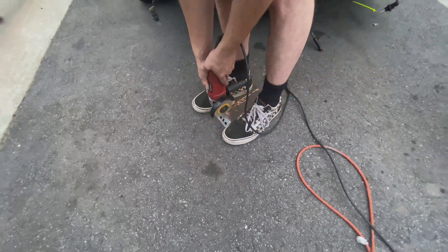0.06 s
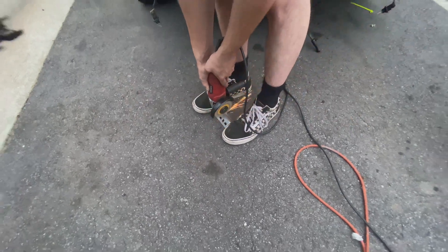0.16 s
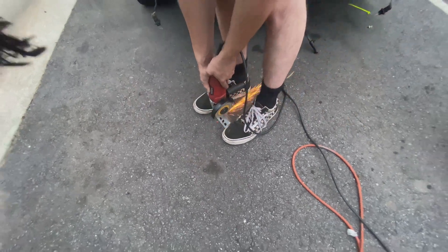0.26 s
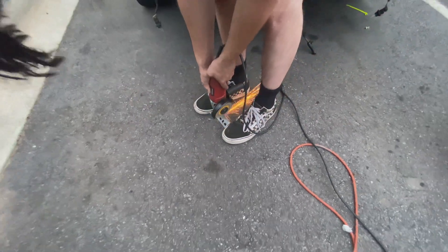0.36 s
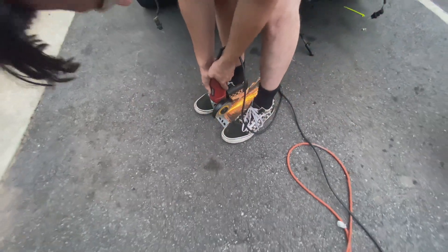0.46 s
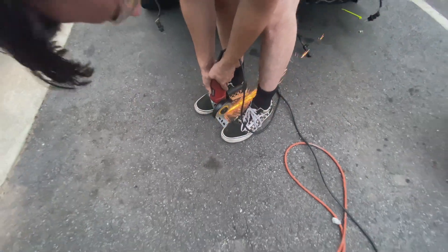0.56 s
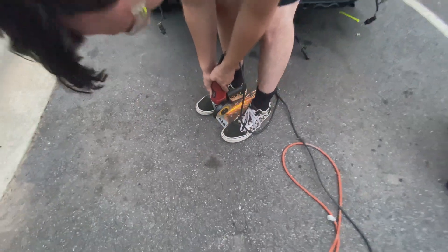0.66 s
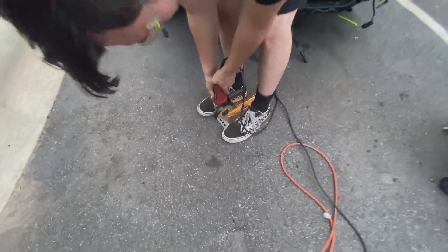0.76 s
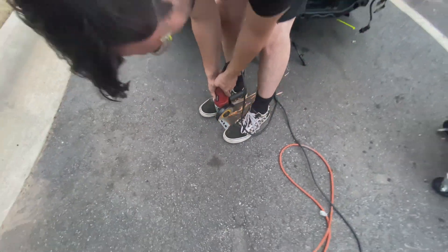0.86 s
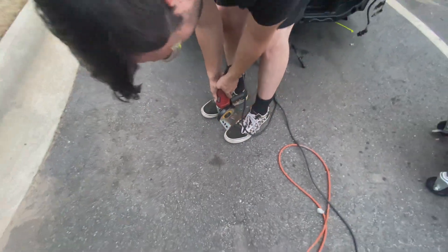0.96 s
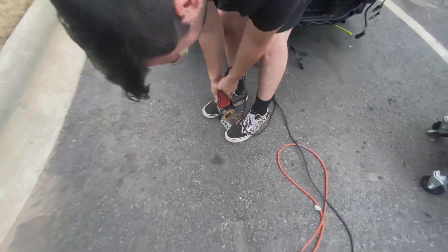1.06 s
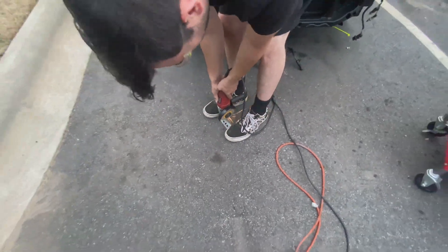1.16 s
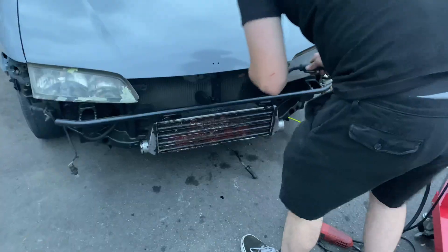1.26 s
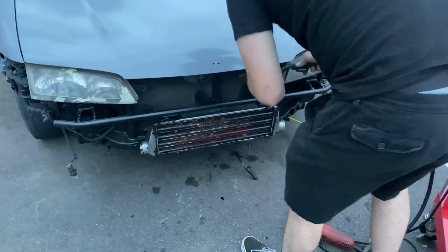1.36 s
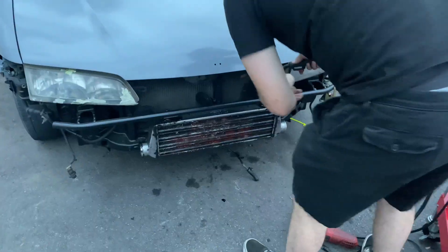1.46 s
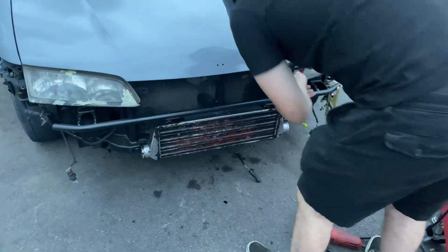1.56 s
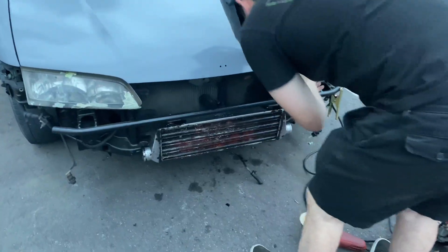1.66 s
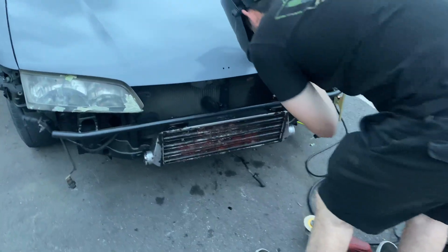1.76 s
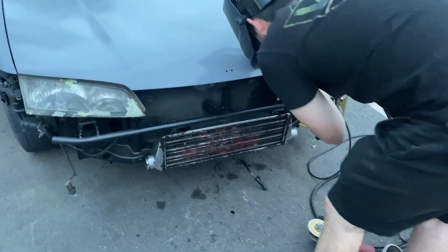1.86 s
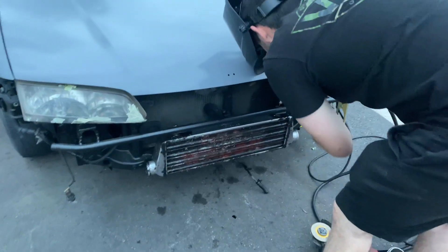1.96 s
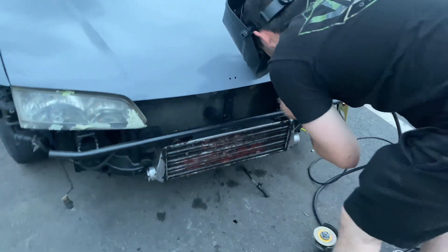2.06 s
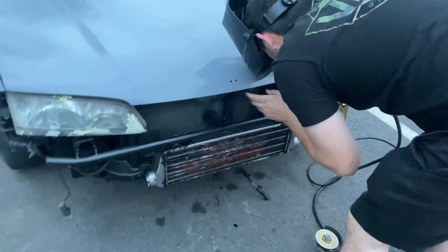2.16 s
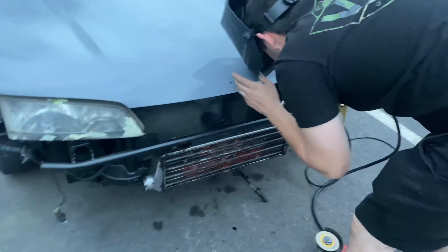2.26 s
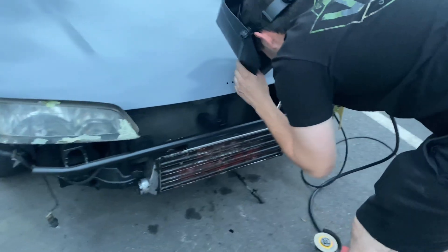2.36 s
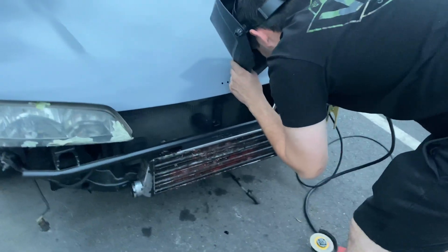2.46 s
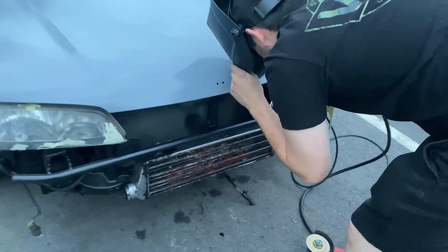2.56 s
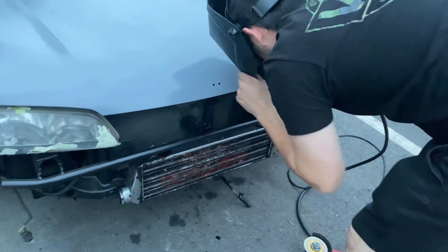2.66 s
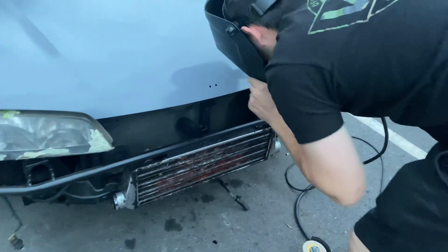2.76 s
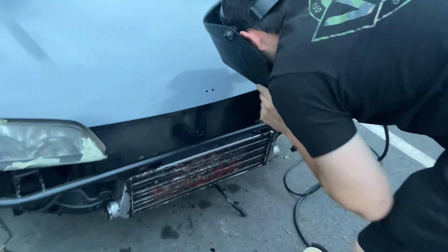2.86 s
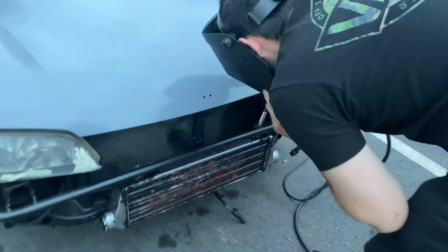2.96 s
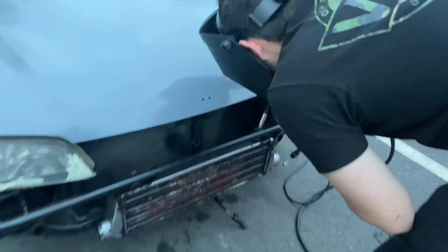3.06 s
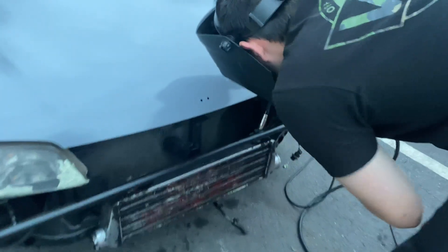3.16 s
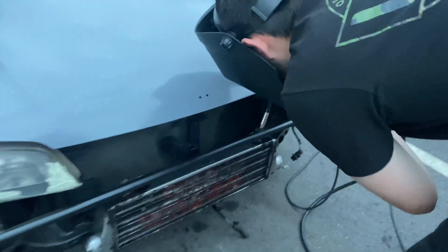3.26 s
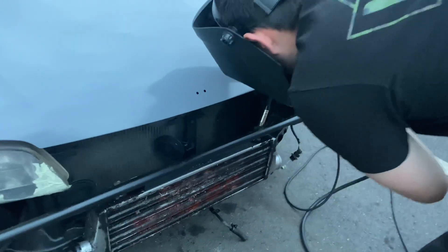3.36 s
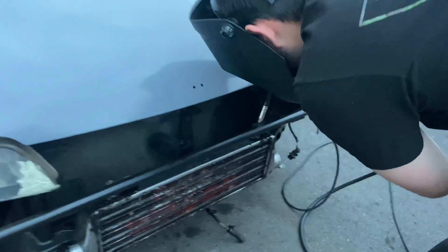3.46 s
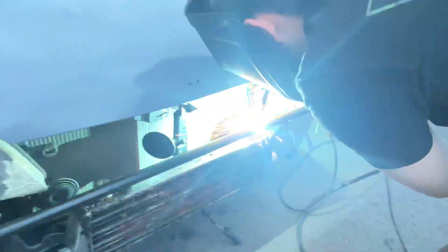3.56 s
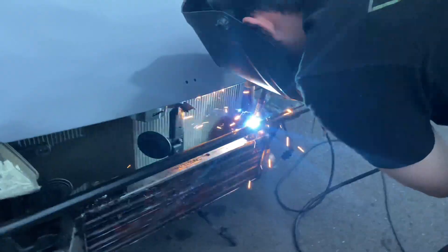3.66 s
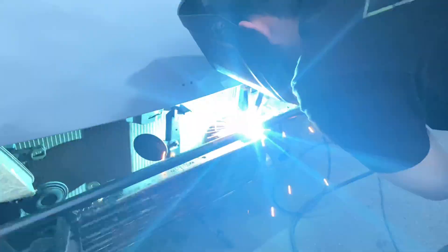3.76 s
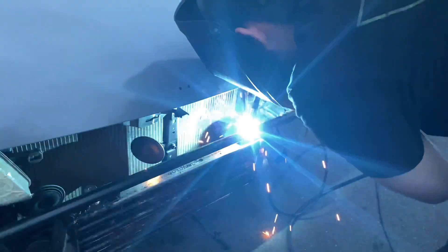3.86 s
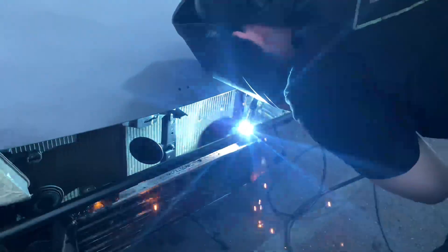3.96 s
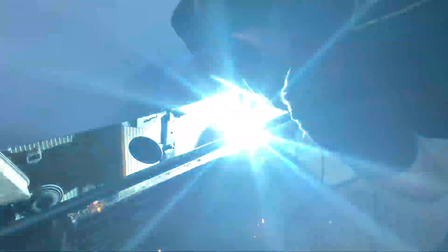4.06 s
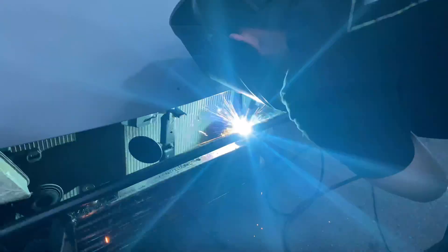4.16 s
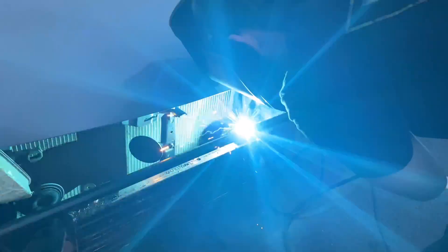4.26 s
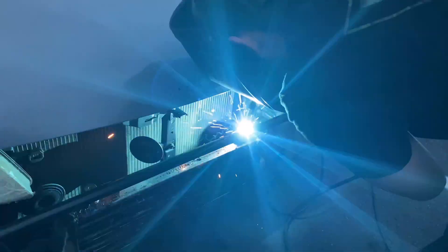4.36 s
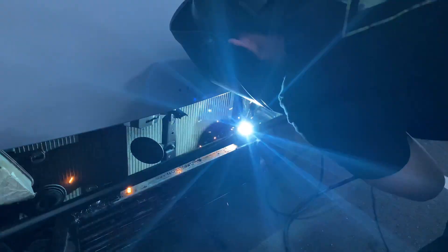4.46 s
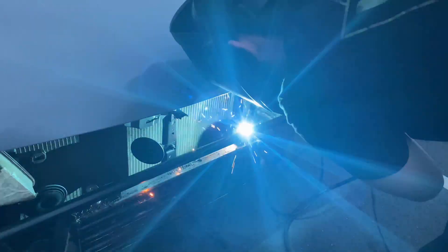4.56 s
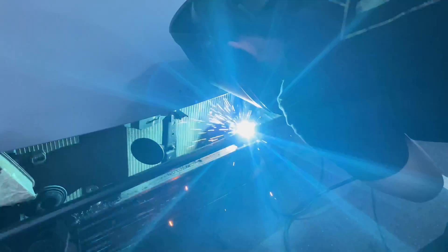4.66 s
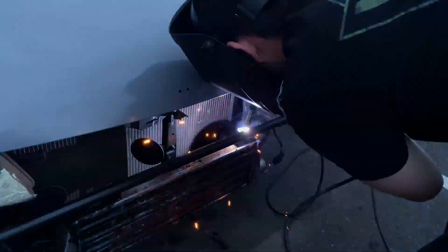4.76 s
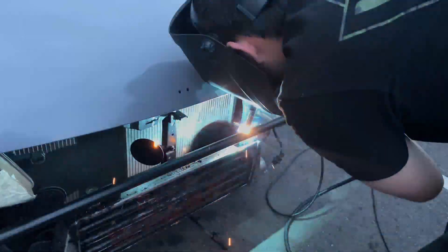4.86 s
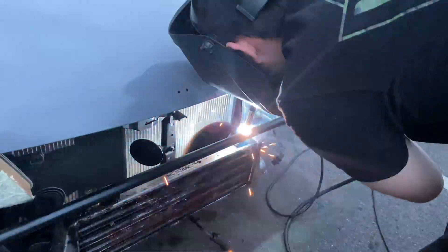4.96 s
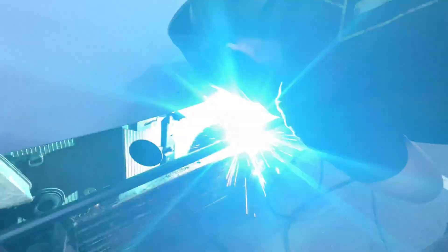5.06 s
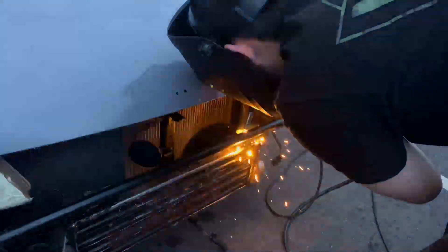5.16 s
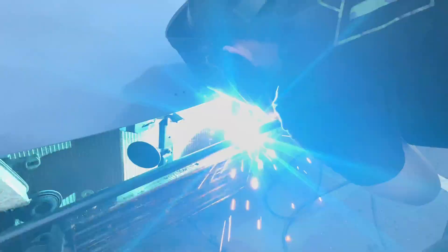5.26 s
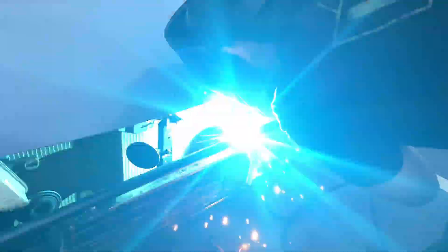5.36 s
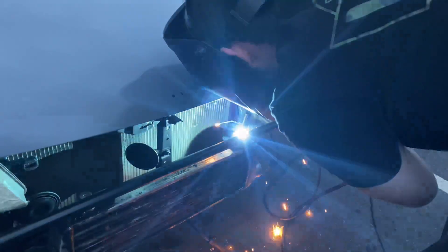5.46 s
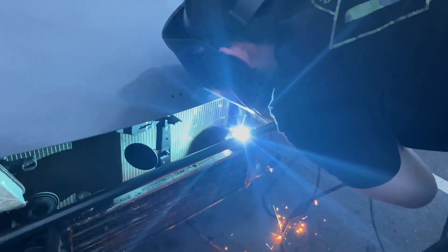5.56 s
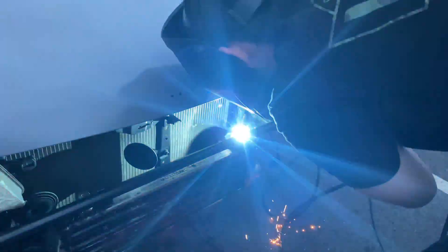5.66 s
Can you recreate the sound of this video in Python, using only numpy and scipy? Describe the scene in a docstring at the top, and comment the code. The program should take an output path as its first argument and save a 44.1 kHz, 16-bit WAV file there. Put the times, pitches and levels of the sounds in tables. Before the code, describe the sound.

A power cutting tool rasps harshly through steel, stops dead, then quiet handling and clunks give way to sputtering welding crackles outdoors.

```python
"""An angle grinder cuts steel: a toothed noise that repeats with the wheel, over motor hum, until it stops dead.
The scene jumps to welding at a car's front: fan whine and air, then knocks, rustles, scrapes and hollow clunks.
Shielding gas starts to hiss as decaying filtered noise; the wire strikes the steel with a clink.
The arc then stutters: grain bursts with bass thumps for pops, noise swells around them and for flares.
Low rumble runs throughout; a stereo phone close by adds echoes, delayed lows and a treble limit."""
import sys
import numpy as np
from scipy import signal
from scipy.fft import rfft, irfft, next_fast_len
from scipy.io import wavfile
from scipy.ndimage import uniform_filter1d

SR = 44100
rng = np.random.default_rng(int(sys.argv[2]) if len(sys.argv) > 2 else 0)


def waveform_to_disk(signal):
    """Save audio, clipped to [-1, 1], as 16-bit WAV at the path in sys.argv[1]."""
    frames = np.transpose(np.atleast_2d(signal))
    scaled = np.clip(frames, -1, 1) * 32767
    samples = np.round(scaled).astype(np.int16)
    wavfile.write(sys.argv[1], SR, samples)


N = 251811
T = np.arange(N) / SR
SIZE = next_fast_len(N + SR // 2)
HZ = np.arange(SIZE // 2 + 1) * SR / SIZE
CUT_S = 1.201  # end of the grinding, start of the welding scene

# arc pops: (time [s], level [dB], thump level [dB], spitting length [ms])
POP_EVENTS = [(3.4965, -25, -34, 0.46), (3.5018, -19.5, -57, 11), (3.523, -23, -44.5, 29),
              (3.5412, -29, -59, 3.7), (3.547, -17, -35.5, 10), (3.7101, -21, -39, 9.9),
              (3.721, -21, -44, 8.8), (3.7285, -22, -50, 9.8), (3.741, -28, -60, 13),
              (3.7621, -26, -52, 3.2), (3.784, -21.5, -56, 5.3), (4.094, -18.5, -40, 10.4),
              (4.1239, -18, -27, 7.5), (4.1626, -29.5, -57, 3.5), (4.1916, -28.5, -65, 3.2),
              (4.219, -33.5, -63, 3.3), (4.2428, -27, -53, 4.6), (4.264, -25.5, -54, 4.8),
              (4.287, -29.5, -57, 3.5), (4.3086, -26.5, -58, 6.9), (4.354, -25, -64, 3.5),
              (4.3697, -25.5, -69, 1.1), (4.387, -30.5, -64, 5.1), (4.4631, -19.5, -47, 11),
              (4.4872, -19, -35, 6.7), (4.6067, -18, -59, 4.4), (4.7923, -38, -92, 5.7),
              (4.976, -37, -76, 8.2), (4.996, -18, -41, 5.8), (5.18, -23, -47.5, 6.8),
              (5.223, -26, -55.5, 7), (5.2414, -28.5, -51, 8.5), (5.3236, -23.5, -69, 8.4),
              (5.345, -25, -75, 3.4), (5.5749, -25, -73, 8.5), (5.5854, -28, -77, 3.3)]
POP_BODY_DB = -5.5  # body against treble


def undb(db):
    """Decibels to gain."""
    return 10 ** (np.asarray(db) / 20)


def curves(rows):
    """Each column of a table, joined by straight lines in time."""
    s, *columns = np.transpose(rows)
    return [np.interp(T, s, c) for c in columns]


def through(x, response):
    """Filter a sound by a frequency response."""
    return irfft(rfft(x, SIZE) * response, SIZE)[..., :N]


def colour(points, weight=1):
    """Response of unit power through (Hz, dB) points, straight in log frequency."""
    hz, db = np.transpose(points)
    gain = weight * undb(np.interp(np.log(HZ + 1), np.log(hz), db))
    return gain / np.sqrt(np.mean(gain ** 2))


def causal(gain):
    """Minimum-phase response with these gains: it never sounds ahead of its cause."""
    cepstrum = irfft(np.log(gain), SIZE)
    fold = (1 + np.sign(np.arange(SIZE))) * (np.arange(SIZE) < SIZE // 2)
    return np.exp(rfft(cepstrum * fold, SIZE))


def noise():
    """White noise of unit power."""
    return rng.standard_normal(N)


def walk(rate_hz):
    """Slow random curve through normal knots, rate_hz of them a second."""
    knots = rng.standard_normal(4096)
    return np.interp(T * rate_hz, np.arange(len(knots)), knots)


def unit(x):
    """Scale to unit energy."""
    return x / np.sqrt(np.sum(x ** 2, axis=-1, keepdims=True) + 1e-18)


def unit_power(x):
    """Scale a full-length track to unit power."""
    return np.sqrt(N) * unit(x)


def add(track, s, x):
    """Lay a short sound into a track at time s."""
    i = int(s * SR)
    track[i:i + len(x)] += x[:N - i]


def burst(ms, first, grain_db, fade=4):
    """A sharp click, then uneven smaller ones that die after ms, more abruptly the higher fade is."""
    t = T[:SR // 10]
    clicks = rng.standard_normal(len(t)) * undb(grain_db * rng.standard_normal(len(t)))
    cluster = unit(clicks * np.exp(-(t / (max(ms, .1) / 1000)) ** fade))
    cluster[0] += first
    return unit(cluster)


def swell(s, db, rise_s, fall):
    """Gain that grows exponentially to a crest at s and dies away fall times as slowly."""
    return undb(db) * np.exp(-np.maximum(s - T, (T - s) / max(fall, .1)) / max(rise_s, .002))


def shares(body_db):
    """Gains of body and treble that keep the total power."""
    total = np.hypot(1, undb(body_db))
    return undb(body_db) / total, 1 / total


def voiced(body, treble, points, split_hz=5100):
    """Colour two excitations with the lower and the upper part of one spectrum."""
    low = 1 / (1 + (HZ / split_hz) ** 6)
    return through(body, colour(points, low)) + through(treble, colour(points, 1 - low))


def bass(x, points, skew_rad=0.96):
    """Coloured low sound, out of step between the two microphones by skew_rad."""
    return through(x, colour(points) * np.exp(.5j * skew_rad * np.array([[1], [-1]])))


def spread(points, side_db):
    """Coloured stereo noise, wider the higher side_db is."""
    mid, side = noise(), undb(side_db) * noise()
    return through(np.array([mid + side, mid - side]), colour(points))


def reflections(near_db, near_s, tail_db, t60):
    """Dense echoes off nearby metal and ground, then a short outdoor tail."""
    t = T[:SR // 4]
    near, tail = rng.standard_normal((2, len(t)))
    near = undb(near_db) * unit(near * np.exp(-(t / near_s) ** 4))
    return near + undb(tail_db) * unit(tail * undb(-60 * t / t60))


def place(x, near_db, near_s, tail_db, t60, scatter_db, turn_hz=450, beam_hz=10000):
    """Direct sound, then echoes that differ between the microphones, less so above beam_hz."""
    shared, left, right = (reflections(near_db, near_s, tail_db, t60) for _ in range(3))
    lag_s = 9.9 / SR
    # the left microphone hears it later, and its treble in opposite phase
    port = np.exp(-2j * np.pi * HZ * lag_s) * (turn_hz - 1j * HZ) / (turn_hz + 1j * HZ)
    own, common = shares(scatter_db - 20 * np.clip(np.log2((HZ + 1) / beam_hz) / 0.27, 0, 1))
    direct = np.array([port, np.ones(len(HZ))])
    response = (1 + common * rfft(shared, SIZE)) * direct + own * rfft(np.array([left, right]), SIZE)
    # echoes ripple the spectrum finely but leave its broad colour alone
    return through(x, response / causal(np.sqrt(uniform_filter1d(abs(response) ** 2, size=900))))


def alternating(x, hold_s, count=3, **room):
    """Fades to another of count random echo patterns every hold_s, in a cycle."""
    weights = [np.clip(1 - abs((T / hold_s - k) % count - 1), 0, 1) for k in range(count)]
    return sum(place(x * weight ** .7, **room) for weight in weights)


def rim(turns, count=104, size=4096):
    """The wheel's own uneven edge, count random-phase harmonics, passes the steel anew on every turn."""
    profile = irfft(np.r_[0, np.exp(2j * np.pi * rng.random(count))], size)
    return np.interp(turns % 1 * size, np.arange(size), profile / profile.std())


def grinder(trim_db=-0.5, grit_db=8.0):
    """Edge and loose grit scratch the steel, a high spot bites once a turn, the motor hums and whines."""
    # load: (time [s], cut level before trim [dB], motor hum level [dB])
    load = [(0.0, -34, -76), (0.172, -35.5, -76), (0.45, -28.5, -71), (0.58, -29, -69),
            (0.864, -35.5, -56.5), (1.116, -36.5, -63), (1.152, -35, -69), (1.19, -37.5, -79)]
    # motor speed, sagging under load: (time [s], rotation [Hz])
    motor_speed = [(0, 468), (.17, 482.4), (.3, 481.9), (.52, 471.3), (.7, 477.7), (.9, 495.4),
                   (1.066, 503), (1.2, 504.5)]
    # motor whine: (multiple of motor speed, level at loudest hum [dB])
    motor_orders = [(2, -58), (3, -55), (31, -37)]
    # orders that sing in the cut: (multiple of wheel speed, level against the cut [dB])
    wheel_orders = [(8, -26), (48, -18), (49, -16), (57, -12), (69, -17), (73, -16), (78, -13)]
    # spectra of cut and bite: (frequency [Hz], relative level [dB])
    cut_colour = [(100, -25), (350, -34.5), (650, -25.5), (830, -3.5), (960, -6.5), (1100, -12),
                  (1400, -9.5), (1900, -10.5), (2500, -5), (3500, -2.5), (4200, -1.5), (4800, 1.5),
                  (5250, 6.5), (5700, 3.5), (6150, 6.5), (6900, -0.5), (7400, 6.5), (7900, -2), (8700, 21),
                  (9500, 7), (10500, 8.5), (11300, 3), (12000, 10), (13300, 2), (14700, 10.5), (15600, 0),
                  (16100, -48)]
    bite_colour = [(1500, -28), (5000, -17.5), (8000, -27), (8700, -1), (9800, 8), (12000, 14),
                   (13300, -5.5), (15500, -7.5), (16100, -53)]
    bite_db, bite_turns = -7, .03  # high spot: level against the cut, width as a share of a turn
    body_db, body_db_per_s = -10, 5.5  # body against treble; it fills out as the groove deepens

    db, motor_db = curves(load)
    motor = np.cumsum(curves(motor_speed)[0] * (1 + .0012 * walk(200))) / SR  # turns
    wheel = motor * 12 / 37  # turns, geared down
    strength = undb(2 * rng.standard_normal(2048)[wheel.astype(int)] + 2 * walk(9))
    bite = unit_power(strength * np.exp(-((wheel % 1 - .5) / bite_turns) ** 2))
    grit = unit_power(noise() * undb(grit_db * noise()))
    # the contact shifts from one part of the edge to another
    shift = walk(7)
    edge = np.cos(shift) * rim(wheel) + np.sin(shift) * rim(wheel)

    force = undb(db + trim_db)
    rasp = force * (.8 * grit + .58 * edge)
    scratch = force * (.55 * grit + .83 * edge)
    deepening = undb(body_db + body_db_per_s * np.minimum(T, CUT_S))
    cutting = voiced(rasp * deepening, scratch, cut_colour)
    biting = place(through(scratch * bite * undb(bite_db), colour(bite_colour)),
                   near_db=-9, near_s=.002, tail_db=-14, t60=.05, scatter_db=10)

    whine = sum(undb(order_db + 2 * walk(20)) * np.sin(2 * np.pi * k * motor) for k, order_db in motor_orders)
    # the freely spinning motor whines louder as its hum grows
    whine = whine * undb(.15 * (motor_db - motor_db.max()))
    hum = np.sqrt(2) * np.sin(2 * np.pi * motor) * undb(motor_db + 1.5 * walk(60))
    ring = force * sum(undb(order_db + 3 * walk(20)) * np.sin(2 * np.pi * k * wheel)
                       for k, order_db in wheel_orders)
    singing = place(whine + ring, near_db=-6, near_s=.003, tail_db=-14, t60=.05, scatter_db=6)
    heard = alternating(cutting, hold_s=.14, count=4,
                        near_db=0, near_s=.006, tail_db=-9, t60=.08, scatter_db=10)
    return heard + biting + singing + hum


def ringing():
    """Short decaying modes of the steel bumper tube and engine bay after one snap."""
    # modes: (frequency [Hz], relative level [dB], t60 [s])
    modes = [(1595, -2, .04), (1810, -5, .04), (2740, -2, .08), (2945, -2, .07), (3430, -4, .06),
             (5590, -6, .05), (6580, -3, .08), (6830, -4, .08)]
    t = T[:SR // 4]
    return sum(undb(db) * unit(np.sin(2 * np.pi * hz * t) * undb(-60 * t / t60)) for hz, db, t60 in modes)


def pops(snap=0.94):
    """The wire shorts and bursts: a snap, spitting droplets and a thump of hot gas."""
    # spectra of crackle and thump: (frequency [Hz], relative level [dB])
    pop_colour = [(100, -59.5), (300, -22), (450, -6), (600, -25), (740, -11), (950, -3), (1150, -2.5),
                  (1400, -7.5), (1680, 4.5), (2100, -12), (3200, -0.5), (4600, 6.5), (5700, 3.5),
                  (9000, 7.5), (10200, 4.5), (11700, 11), (15500, 7.5), (16500, -19)]
    thump_colour = [(25, -44.5), (70, 10), (150, 7.5), (380, 8.5), (650, -5), (2000, -10), (8000, -79)]
    body, treble, thumps = np.zeros((3, N))
    low, high = shares(POP_BODY_DB)
    for s, db, thump_db, ms in POP_EVENTS:
        # the shorter the burst, the more of it lies in the first snap
        spit = burst(ms, snap / max(ms, .5) ** 0.25, grain_db=8.5) * undb(db) * np.sqrt(0.017 * SR)
        add(body, s, low * spit)
        add(treble, s, high * spit)
        add(thumps, s, undb([thump_db]) * np.sqrt(0.01 * SR))
    crackle = voiced(body, treble, pop_colour) + undb(-24) * through(body, rfft(ringing(), SIZE))
    heard = alternating(crackle, hold_s=.045, count=5,
                        near_db=-1, near_s=.005, tail_db=-6, t60=.06, scatter_db=12)
    return heard + bass(thumps, thump_colour)


def hiss():
    """Shielding gas rushes from the nozzle as noise; the arc flares and sputters, and noise swells around pops."""
    # arc flares: (crest time [s], level [dB], body against treble [dB], rise [s])
    flares = [(3.714, -26, -11, 0.018), (3.956, -39, 2.5, 0.037), (4.097, -30, 7, 0.017),
              (4.28, -38.5, -2.5, 0.04), (4.455, -35.5, -19, 0.051), (4.588, -36.5, -14, 0.014),
              (4.749, -33, -6.5, 0.0093), (4.798, -32, 2, 0.0072), (4.826, -38, -4.5, 0.014),
              (4.883, -30, 2, 0.007), (4.941, -25, 6, 0.0035), (4.985, -26, 5, 0.014),
              (5.077, -33, 11, 0.0021), (5.14, -29, -10, 0.0044), (5.312, -36, -15.5, 0.056),
              (5.396, -36, -33, .008), (5.57, -24.5, -16, 0.027), (5.58, -38, 8, 0.0046),
              (5.641, -25, -23.5, 0.035)]
    # spectrum: (frequency [Hz], relative level [dB])
    hiss_colour = [(200, -49.5), (450, -31.5), (700, -24), (1200, -16.5), (1700, -5.5), (2400, -13.5),
                   (3600, -1), (4600, -3.5), (6000, 1.5), (9500, -1), (12000, 6), (15500, 3),
                   (16300, -38.5)]
    gas_on_s = 3.243  # the trigger opens the gas valve
    gas_db, gas_body_db, gas_fade_db_per_s = -46.5, -4, 10.5  # the first surge dies away
    flare_fall = 1.52  # as a multiple of the rise
    # faint spits while the arc barely holds; the level is for a spit of size 1
    sputter_start_s, sputter_end_s, sputter_per_s = 4.72, 5.3, 36
    sputter_db, sputter_rise_s, sputter_body_db = -45, .006, -0.5
    # soft noise swell around every pop: level against the pop, rise, fall as a multiple of the rise
    pop_swell_db, pop_swell_rise_s, pop_swell_fall = -13, .004, 3
    fizz_db = 4.5  # spread of the grains

    flow = undb(gas_db - gas_fade_db_per_s * np.maximum(T - gas_on_s, 0)) * (T > gas_on_s)
    fizz = unit_power(noise() * undb(fizz_db * noise() + 2 * walk(300)))
    chance = rng.random((40, 2))
    spit_times = sputter_start_s + np.cumsum(.5 + chance[:, 0]) / sputter_per_s

    parts = [(flow, gas_body_db)]
    for s, db, body_db, rise_s in flares:
        parts.append((swell(s, db, rise_s, flare_fall), body_db))
    for s, size in zip(spit_times, chance[:, 1]):
        if s < sputter_end_s:
            parts.append(((.5 + size) * swell(s, sputter_db, sputter_rise_s, flare_fall), sputter_body_db))
    for s, db, _, _ in POP_EVENTS:
        parts.append((swell(s, db + pop_swell_db, pop_swell_rise_s, pop_swell_fall), POP_BODY_DB))
    # powers of all parts add up
    low, high = np.sqrt(sum(np.outer(shares(body_db), gain) ** 2 for gain, body_db in parts))
    return place(voiced(low * fizz, high * fizz, hiss_colour),
                 near_db=1, near_s=.006, tail_db=1, t60=.07, scatter_db=12)


def strike():
    """The cold wire first stubs on the steel: a clink with a short chatter."""
    # one touch: time [s], level [dB], chatter length [ms]
    s, db, ms = (3.4959, -18, 5)
    # spectrum: (frequency [Hz], relative level [dB])
    strike_colour = [(1500, -16), (2400, -13.5), (2900, -3), (3500, -3), (4500, -7.5), (5700, -21),
                     (6800, -4), (8500, -46)]
    touch = np.zeros(N)
    add(touch, s, burst(ms, 2, grain_db=6) * undb(db) * np.sqrt(.017 * SR))
    return place(through(touch, colour(strike_colour)),
                 near_db=-4, near_s=.004, tail_db=-3, t60=.06, scatter_db=6)


def handling(fibre_db=4):
    """Torch and hands knock, a dull thud and clack with a short rattle; sleeves brush past as grainy noise."""
    # knocks: (time [s], thud level [dB], clack level [dB], rattle length [ms], thud left minus right [dB])
    knocks = [(1.348, -43, -56, 13, -11.5), (1.431, -46, -58.5, 35, -14), (1.571, -24.5, -28.5, 20, -5.5),
              (1.601, -35.5, -56, 20, -9), (1.722, -40.5, -36, 9.4, -6.5), (1.734, -34, -42, 17, -5),
              (2.0852, -43, -50, 8.4, -2), (2.381, -45.5, -66, 3, -0.5), (3.243, -75, -36, 15, 5)]
    # clothes: (start time [s], level [dB], length [s])
    rustles = [(1.357, -53, 0.11), (2.286, -66, 0.18), (2.478, -44.5, 0.14), (2.932, -60.5, 0.21)]
    # spectra of thud, clack and rustle, sliding cloth: (frequency [Hz], relative level [dB])
    thud_colour = [(25, -28), (45, -12), (80, 12), (130, 2.5), (220, 5.5), (350, 0.5), (550, 0), (800, -10),
                   (1500, -10.5), (8000, -79)]
    clack_colour = [(200, -8.5), (1000, 1.5), (2200, 2.5), (4000, -3), (7000, -18), (15000, -24)]
    swish_colour = [(3000, 0), (7000, 5), (9300, -21), (11500, 1.5), (15500, -25), (16300, -30)]
    swish_db = -59.5  # thin hiss of sliding cloth

    left, right, clacks, cloth, sliding = np.zeros((5, N))
    for s, thud_db, clack_db, ms, pan_db in knocks:
        blow = burst(ms, 3 / max(ms, .3), grain_db=3.0, fade=2.1) * np.sqrt(0.0059 * SR)
        add(left, s, blow * undb(thud_db + pan_db / 2))
        add(right, s, blow * undb(thud_db - pan_db / 2))
        add(clacks, s, blow * undb(clack_db))
    for s, db, length_s in rustles:
        stroke = np.sin(np.pi * np.clip((T - s) / length_s, 0, 1))
        cloth += undb(db) * stroke
        sliding += stroke
    fibres = unit_power(noise() * undb(fibre_db * noise() + 3.5 * walk(180)))
    bright = through(clacks + cloth * fibres, colour(clack_colour))
    bright += undb(swish_db) * through(sliding * fibres, colour(swish_colour))
    thuds = bass(np.array([left, right]), thud_colour)
    return thuds + place(bright, near_db=2.0, near_s=0.0034, tail_db=0.0, t60=0.069, scatter_db=28)


def clunks():
    """Single blows on a hollow shell, duller the softer the contact, with a short rattle of echoes."""
    # touch, landing and bounce: (time [s], level [dB], contact [ms])
    contacts = [(2.666, -31, 0.64), (2.6909, -21, .1), (2.728, -36, 0.85)]
    # spectrum: (frequency [Hz], relative level [dB])
    clunk_colour = [(25, -26), (75, 11.5), (200, 0), (420, -0.5), (620, 0), (900, 1), (1270, -11.5),
                    (2200, -8.5), (3400, -22.5), (15000, -36)]
    blows = np.zeros(N)
    for s, db, ms in contacts:
        push = np.hanning(2 + max(1, int(ms / 1000 * SR)))
        add(blows, s, push / push.sum() * undb(db) * np.sqrt(.01 * SR))
    echoes = rfft(np.array([reflections(-15, .004, -15, .08) for _ in range(2)]), SIZE)
    left_louder = undb(np.array([[1], [-1]]))
    return through(bass(blows, clunk_colour, skew_rad=2.0) * left_louder, 1 + echoes)


def scrapes(width=0.2):
    """A hand or sleeve catches and slips in short grainy strokes of band noise, each with its own pitch."""
    # strokes: (start time [s], level [dB], length [s], centre [Hz])
    strokes = [(1.385, -43, 0.014, 3750), (1.747, -49, .012, 3860), (2.504, -45, 0.021, 2420),
               (2.508, -36.5, 0.022, 725), (2.54, -44, 0.015, 1030), (2.56, -46.5, 0.089, 1350),
               (2.616, -43, 0.013, 480), (3.013, -51, 0.044, 2700), (3.038, -48, 0.024, 2020)]
    out = 0
    for s, db, length_s, hz in strokes:
        catches = unit_power(noise() * undb(5 * walk(500)))
        band = 1 / (1 + 1j * (HZ / hz - hz / (HZ + 1)) / width)
        stroke = np.sin(np.pi * np.clip((T - s) / length_s, 0, 1) ** .6)
        out = out + undb(db) * through(catches * stroke, band / np.sqrt(np.mean(abs(band) ** 2)))
    return place(out, near_db=1.5, near_s=0.0036, tail_db=-2, t60=0.19, scatter_db=9)


def yard(air_db=-58):
    """Low rumble of wind and of the phone being handled; at the car the welder's fan blows noise and sings."""
    # swells of the rumble: (crest time [s], level [dB], rise [s])
    rumble_swells = [(0.731, -56.5, 0.012), (1.26, -50.5, 0.039), (1.42, -53, 0.3), (1.629, -44.5, 0.058),
                     (1.83, -52.5, 0.087), (2.16, -55, 0.03), (2.287, -48.5, 0.038), (2.64, -52, 0.049),
                     (3.302, -55, 0.12), (3.9, -60, 1)]
    # mains hum and fan whine: (frequency [Hz], level before fade [dB])
    fan_tones = [(59.6, -66), (1387, -64.5)]
    # fan tones fade before the welding: (time [s], gain [dB])
    fan_fade = [(1.2, 2), (2.9, -1), (3.2, -12.5)]
    # spectra of rumble and blown air: (frequency [Hz], relative level [dB])
    rumble_colour = [(20, -34), (35, -17.5), (62, 10.5), (110, 1), (200, 0), (400, -7.5), (900, -12.5),
                     (4000, -82.5)]
    air_colour = [(50, 26), (400, 7.5), (1000, 12.5), (2000, 12), (4000, 3), (6300, -1), (9000, -15),
                  (13000, -11.5), (16000, -45)]
    grinding_db, welding_db = -90.5, -79  # steady rumble in either scene
    swell_fall = 1  # as a multiple of the rise

    steady = undb(np.where(T > CUT_S, welding_db, grinding_db))
    rumble_gain = np.sqrt(steady ** 2 + sum(swell(s, db, rise_s, swell_fall) ** 2
                                            for s, db, rise_s in rumble_swells))
    rumble = bass(noise() + .3 * np.array([noise(), noise()]), rumble_colour)
    rumble = rumble * rumble_gain * undb(2 * walk(14))
    air = spread(air_colour, side_db=-0.5) * undb(air_db + 1.02 * walk(5.76))
    fan = 0
    for hz, db in fan_tones:
        gain = np.sqrt(2) * undb(db + 2.7 * walk(23))
        turns = np.cumsum(hz * (1 + 0.002 * walk(26))) / SR
        fan = fan + gain * np.sin(2 * np.pi * turns)
    # the rush of air grows fainter during the welding
    air_fade_db = np.interp(T, [3.1, 3.6, 5.5], [0, -4, -8])
    return rumble + (air * undb(air_fade_db) + fan * undb(curves(fan_fade)[0])) * (T > CUT_S)


def scene():
    """Grinding up to the cut, then the welding."""
    before_cut = np.clip((CUT_S - T) / 0.0027, 0, 1)
    return grinder() * before_cut + yard() + handling() + clunks() + scrapes() + hiss() + strike() + pops()


def record(dry, lag_cycles=1.3, top_hz=16400):
    """Delay each frequency by about lag_cycles, so thumps sweep downward; soft-limit; cut the top."""
    late_lows = np.exp(-2j * np.pi * lag_cycles * np.log(np.hypot(HZ, 40)))
    limited = np.tanh(through(dry, late_lows))
    return signal.sosfilt(signal.ellip(8, .2, 70, top_hz, fs=SR, output="sos"), limited)


dry = scene()
out = record(dry)
waveform_to_disk(out)
```